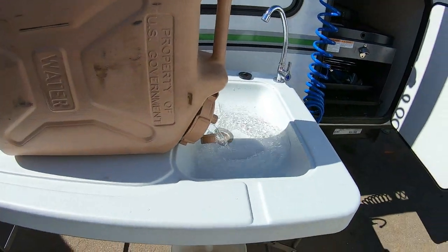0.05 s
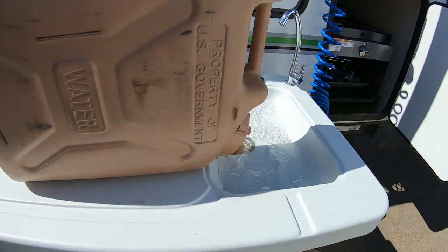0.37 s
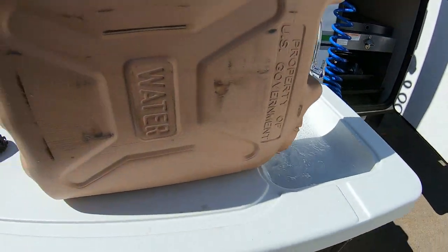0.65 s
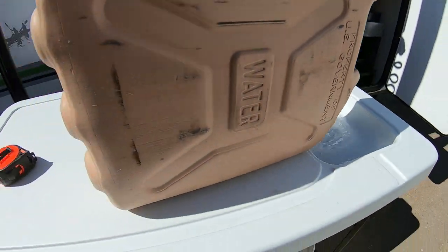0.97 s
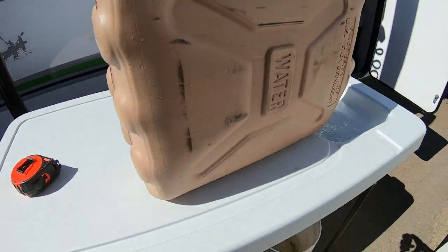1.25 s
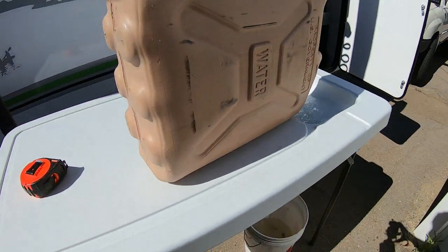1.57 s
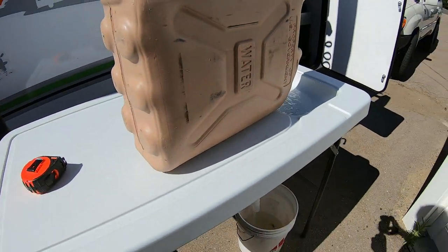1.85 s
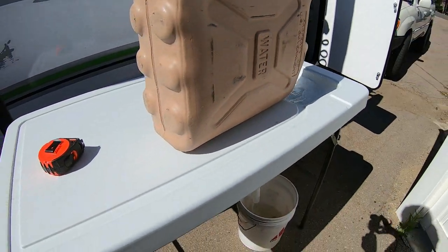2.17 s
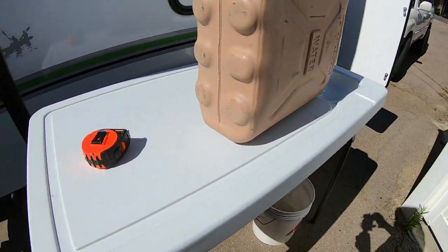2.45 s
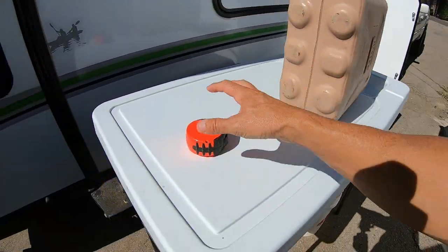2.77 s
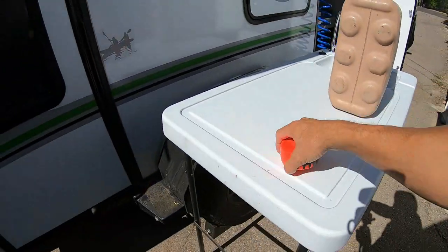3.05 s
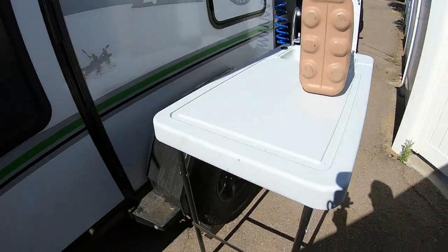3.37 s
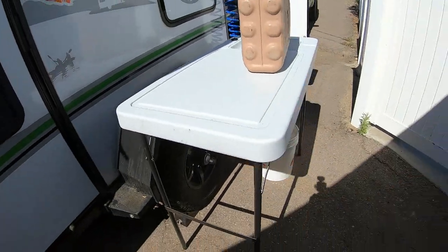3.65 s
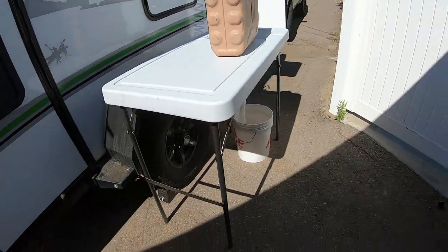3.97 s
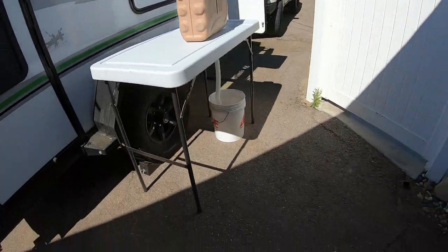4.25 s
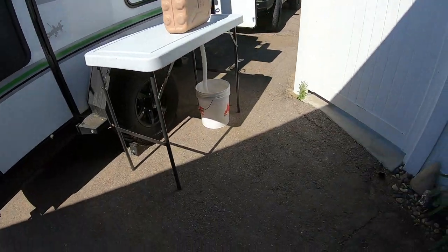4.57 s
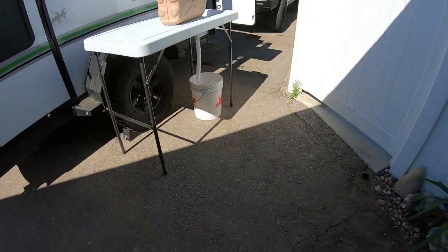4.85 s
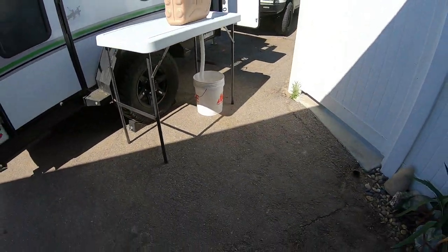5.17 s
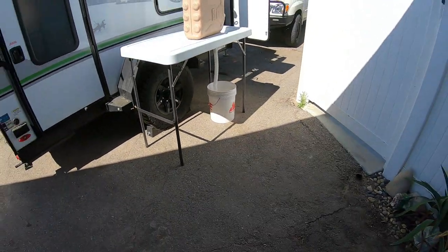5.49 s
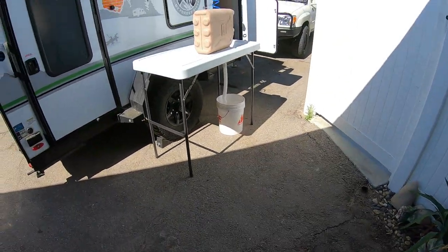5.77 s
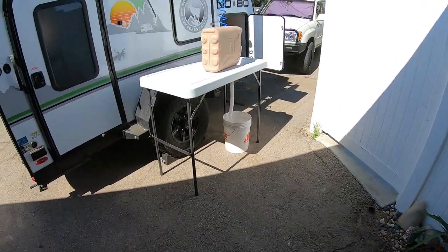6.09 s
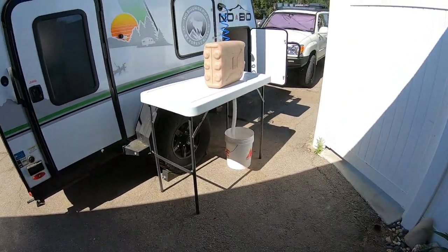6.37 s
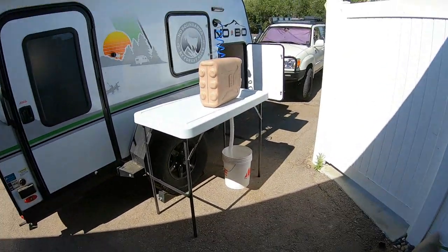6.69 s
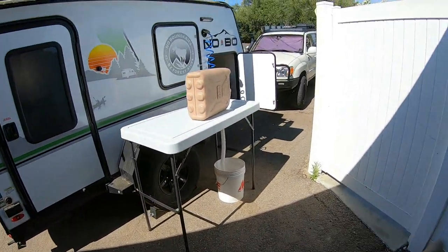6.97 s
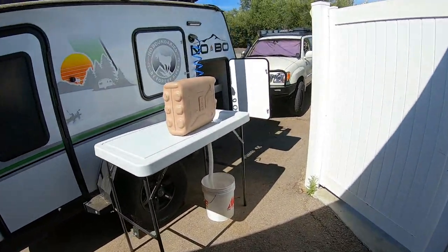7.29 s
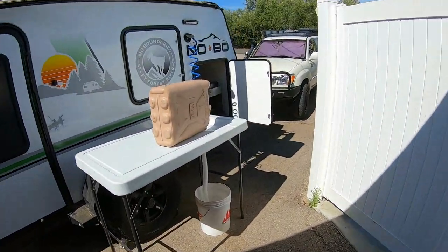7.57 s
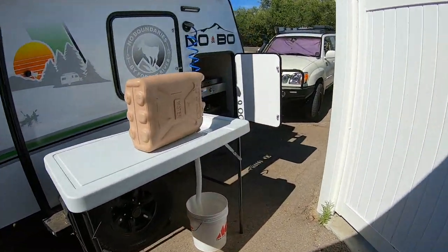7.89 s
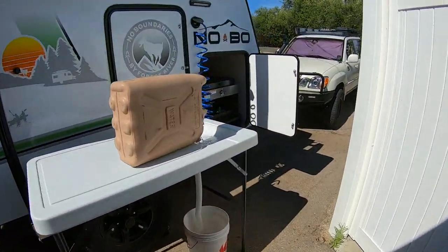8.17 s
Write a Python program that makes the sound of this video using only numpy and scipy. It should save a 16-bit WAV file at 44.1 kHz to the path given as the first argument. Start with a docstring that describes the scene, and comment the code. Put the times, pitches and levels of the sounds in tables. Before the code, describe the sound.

Outdoors, a thin stream of water fizzes, bubbles and splashes into a plastic bucket throughout. At first a fine sizzle of pouring and ticking drops come from a sink, along with dull handling knocks on the handheld microphone. Wind then thumps and rumbles as a hand brushes a table. A single gritty footstep scuff follows, and a few more hollow knocks come late while the trickle carries on.

```python
"""Pouring water into a camp sink

Outdoors, water runs from a plastic can into a sink and drains through a hose into a plastic bucket.
Tiny drops fizz, trapped bubbles ring and lumps of water splash, while the air in the bucket rings along.
A hand bumps the plastic grip of the moving microphone with dull knocks, and wind buffets it.
A hand lifts a tape measure off the table, clothes rustle and a shoe scuffs the asphalt once."""
import sys
import numpy as np
from scipy import signal
from scipy.fft import rfft, irfft, next_fast_len
from scipy.io import wavfile
from scipy.ndimage import uniform_filter1d

SR = 44100
rng = np.random.default_rng(int(sys.argv[2]) if len(sys.argv) > 2 else 0)


def unload_wav(signal):
    """Save mono or channel-first audio to the path in sys.argv[1] as 16-bit WAV at rate SR, clipped to [-1, 1]."""
    wavfile.write(
        sys.argv[1],
        SR,
        np.round(np.clip(np.atleast_2d(signal).T, -1, 1) * 32767).astype(np.int16),
    )


N = 362943
TIME = np.arange(N) / SR

# the tone colour of water drops (how strong each pitch is): pitch_hz, level_db
WATER_COLOUR = [(200, 9), (420, 1.5), (800, -2), (1500, -1), (2300, 1), (3100, 0), (4200, -1), (5500, -5.5),
                (7000, -11.5), (9500, -12.5), (12500, -19), (15700, -26)]
# the tones of the hollow plastic grip: pitch_hz, level_db, ring_s (basic time to fade by 60 dB)
GRIP_TONES = [(75, -6.5, 0.11), (118.6, -2.5, 0.14), (167, -2.5, 0.13), (196.4, 0.5, 0.09),
              (212, -3, 0.067), (287.5, -7, 0.05), (347, -8, 0.067), (518, -0.5, 0.054),
              (583.6, -2.5, 0.076), (660, 7.5, 0.027), (812, 3.5, 0.024), (1000, -5, 0.014),
              (1300, -3, 0.0095), (1720, -8.5, 0.026)]


def from_db(db):
    """Turn decibels into a factor to multiply by."""
    return 10 ** (np.asarray(db) / 20)


def rms_one(x):
    """Scale a signal so that its average strength (rms) is 1."""
    return x / np.sqrt(np.mean(x ** 2) + 1e-20)


def peak_one(x):
    """Scale a signal so that its highest peak is 1."""
    return x / (np.max(np.abs(x)) + 1e-20)


def onset_one(x):
    """Scale a short sound so that the average strength (rms) of its first 20 ms is 1."""
    return x / np.sqrt(np.mean(x[:SR // 50] ** 2) + 1e-12)


def in_time(rows):
    """Join timed points with straight lines: one curve for each column after the time."""
    times, *columns = np.transpose(rows)
    return [np.interp(TIME, times, column) for column in columns]


def coloured(x, colour):
    """Filter a sound by a smooth tone colour that falls away below its first point."""
    size = next_fast_len(len(x))
    hz = np.arange(size // 2 + 1) * SR / size + 1e-3
    points, db = np.transpose(colour)
    gain = from_db(np.interp(np.log(hz), np.log(points), db)) * np.minimum(hz / points[0], 1) ** 2
    return irfft(rfft(x, size) * gain, size)[:len(x)]


def resonate(x, hz, width_hz):
    """Let a sound ring at one pitch; the narrower the width, the longer it rings."""
    r = np.exp(-np.pi * width_hz / SR)
    feedback = [1, -2 * r * np.cos(2 * np.pi * hz / SR), r * r]
    return signal.lfilter(np.array([1, 0, -1]) * (1 - r * r) / 2, feedback, x + 1e-18)


def resonate_twice(x, hz, width_hz):
    """Two resonances in a row let less through on either side of the pitch."""
    return resonate(resonate(x, hz, width_hz), hz, width_hz)


def add(out, start_s, sound):
    """Mix a sound in at its start time."""
    start = int(round(start_s * SR))
    out[start:start + len(sound)] += sound[:len(out) - start]


def clicks(size, per_s, spread_db):
    """Random clicks, up or down: with a positive spread, many small and a few large."""
    out, born = np.zeros(size), rng.random(size) < per_s / SR
    count = born.sum()
    strengths = from_db(spread_db * np.minimum(rng.exponential(1, count), 4))
    out[born] = strengths * rng.choice([-1, 1], count)
    return out


def outdoor_hush(level_db=-47):
    """The far surroundings blend into a soft, steady noise."""
    # the colour of the hush: pitch_hz, level_db
    hush_colour = [(100, 4.5), (200, 1), (400, -7), (800, 0.5), (1400, -4.5), (3800, -14.5), (7000, -16.5),
                   (10000, -19.5), (15700, -25)]
    return from_db(level_db) * rms_one(coloured(rng.standard_normal(N), hush_colour))


def wind(sway_db=5.5, gustiness=0.18, lumpy_db=9.5, buffet_db=-54.5, hum_db=-52.5):
    """Large swirls of air push on the microphone, small ones buffet it; a hollow hum swells with them."""
    # the strength of the wind: time_s, relative_db
    strength_curve = [(0.0, -26), (0.9, -18.5), (1.45, -31.5), (2.3, -23.5), (2.46, -17), (2.55, -22.5),
                      (2.97, -6.5), (3.35, -17.5), (3.68, -15.5), (3.85, -21.5), (4.12, -30.5), (4.45, -19),
                      (5.3, -22), (5.85, -30.5), (6.44, -24.5), (6.85, -35), (7.55, -25.5), (8.23, -24)]
    # the colour of the large swirls: pitch_hz, level_db
    sway_colour = [(6, -2), (12, 6), (22, -10), (32, -16.5), (50, -22.5), (80, -33.5), (130, -44.5),
                   (300, -88.5)]
    # the colour of the small swirls: pitch_hz, level_db
    buffet_colour = [(60, 11.5), (90, -18), (130, 2), (220, -15), (450, -17.5), (1000, -31), (3000, -74)]
    strength_db, = in_time(strength_curve)
    gust_db = strength_db - strength_db.mean()
    noise = rng.standard_normal((3, N))
    swirls = rms_one(coloured(noise[0], sway_colour))
    swirls /= np.sqrt(uniform_filter1d(swirls ** 2, size=SR // 6) + 0.011)  # even out their strength
    push = from_db(strength_db + sway_db + gustiness * gust_db) * swirls
    push = .75 * np.tanh(push / .75)  # the strongest gusts level off
    buffet = rms_one(coloured(noise[1], buffet_colour) * from_db(lumpy_db * swirls))
    hum = rms_one(resonate_twice(noise[2], hz=266.9, width_hz=30))
    return push + from_db(buffet_db + 1.62 * gust_db) * buffet + from_db(hum_db + 0.7 * gust_db) * hum


def gusts(band_ratio=1.284):
    """Each sharp gust thumps the microphone with a short swell of low, swirling air."""
    # the sharp gusts: middle_s, peak_db, swell_s, pitch_hz
    thumps = [(2.461, -14, 0.025, 39.4), (2.748, -19, 0.026, 58.3), (2.908, -7.5, 0.053, 42.4),
              (3.041, -15, 0.028, 57), (3.182, -23.5, 0.058, 80), (3.377, -10.5, 0.056, 42),
              (3.458, -21, 0.019, 63), (3.691, -11.5, 0.0089, 61.4), (4.957, -16, 0.03, 36)]
    t, out = TIME[:SR // 2], np.zeros(N)
    for middle_s, db, swell_s, hz in thumps:
        band = signal.butter(2, [hz / band_ratio, hz * band_ratio], "band", fs=SR, output="sos")
        swirls = signal.sosfilt(band, signal.sosfilt(band, rng.standard_normal(len(t))))
        swell = np.exp(-((t - t.mean()) / swell_s) ** 2)
        add(out, middle_s - t.mean(), from_db(db) * peak_one(swirls * swell))
    return out


def rustles():
    """Rubbing makes tiny clicks: a hand on the table top, and clothes with each move."""
    # a hand brushes the table and lifts a tape measure: time_s, level_db
    brush_curve = [(2.6, -80), (2.72, -52), (2.89, -48), (2.915, -31.5), (2.96, -41.5), (3.1, -53),
                   (3.3, -85)]
    # the colour of that brushing: pitch_hz, level_db
    table_colour = [(240, 4), (360, 11), (480, 0), (700, 2), (1100, -3.5), (2200, -36), (8000, -42)]
    # the moves of the clothes: middle_s, level_db, swell_s
    moves = [(3.078, -42, 0.071), (3.562, -39, 0.047), (4.28, -43.5, 0.11), (4.9, -45, 0.098)]
    # the colour of rubbing cloth: pitch_hz, level_db
    cloth_colour = [(700, 9.5), (1500, 0), (3000, 3.5), (5500, -1.5), (9000, -15), (12800, -9),
                    (15700, -24)]
    grain = clicks(N, per_s=3500, spread_db=5)
    brush = from_db(in_time(brush_curve)[0]) * rms_one(coloured(grain, table_colour))
    swells = sum(from_db(db) / (1 + ((TIME - s) / swell_s) ** 2) ** 2 for s, db, swell_s in moves)
    return brush + swells * rms_one(coloured(grain, cloth_colour))


def scuff(start_s=5.665, heel_db=-33.5, heel_fade_s=0.022, bend_s=0.00495, settle_s=0.035):
    """A heel clicks down and grit grinds under the sole; a hollow ring rises as the weight comes on."""
    # the shoe grinding on asphalt: time_s, level_db
    grind_curve = [(5.66, -77), (5.667, -32), (5.71, -29.5), (5.76, -35), (5.83, -45), (6.1, -67),
                   (6.15, -110)]
    # the colour of the grit: pitch_hz, level_db
    grit_colour = [(60, -2), (140, 13.5), (260, -2), (600, 6.5), (900, -0.5), (1500, -0.5), (2200, -11),
                   (5000, -25), (14000, -53)]
    # the hollow ring of the step: pitch_hz, level_db
    hollow_tones = [(520, 7.5), (640, 3), (748, 9), (1045, 13.5), (1555, 6)]
    t, start = TIME[:SR // 2], int(start_s * SR)
    grit = clicks(N, per_s=9000, spread_db=1.5)
    out = from_db(in_time(grind_curve)[0]) * rms_one(coloured(grit, grit_colour))
    grind = out[start:start + len(t)]
    ring = sum(from_db(db) * resonate(grind, hz, width_hz=18) for hz, db in hollow_tones)
    bent_time = t - bend_s * (1 - np.exp(-t / settle_s))  # runs slow at first, so the pitch starts low
    add(out, start_s, np.interp(bent_time, t, ring))
    heel = rms_one(resonate_twice(grit[:len(t)], hz=2600, width_hz=4000))
    add(out, start_s, from_db(heel_db) * np.exp(-t / heel_fade_s) * heel)
    return out


def fingers(muffle_hz=298):
    """While the hand shifts its hold, the fingers stick and slip softly on the grip."""
    # the shifts of the hand: start_s, end_s, level_db
    shifts = [(0.32, 1.03, -41.5), (7.216, 7.406, -39)]
    slips = clicks(N, per_s=99, spread_db=4)
    rings = sum(from_db(db) * ring_s * resonate(slips, hz, np.log(1000) / (np.pi * ring_s))
                for hz, db, ring_s in GRIP_TONES)
    muffled = signal.sosfilt(signal.butter(2, muffle_hz, fs=SR, output="sos"), rings)
    pressure = sum(from_db(db) * (TIME > start) * (TIME < end) for start, end, db in shifts)
    return uniform_filter1d(pressure, size=SR // 40) * rms_one(muffled)


def knocks(rise_s=0.00058, chatter_above_hz=430):
    """Knocks ring the grip: soft ones reach only its low tones, hard ones chatter, a firm hold damps it."""
    # bumps of the hand, and at 2.464 s a soft, low thump of wind on the microphone:
    # start_s, level_db, hardness_hz, ring_factor, hollow_db, boom_db
    thuds = [(0.3, -12.5, 295, 1.65, 6, 7), (0.327, -18, 420, 0.59, -1, 2),
             (0.561, -30.5, 270, 3.1, -13, 3), (0.72, -14, 400, 1.6, -13, 2), (0.823, 0.5, 440, 0.82, 7, 9),
             (0.888, -8, 230, 0.85, -2, 21), (0.929, -4.5, 290, 0.6, 0, 22),
             (1.309, -15.5, 121, 1.54, 1, -1), (1.712, -17, 141, 1.2, -5, 1),
             (2.464, -20, 200, 1.55, -14, -4), (7.208, 3, 895, 0.67, -8, 8.5),
             (7.228, -5, 160, 0.56, 0, -5), (7.25, -12, 1210, 0.62, 11, -12),
             (7.265, -27, 1200, 0.6, 2, -9), (7.348, -4, 786, 0.95, 5.5, 8),
             (7.484, -13.5, 406, 0.91, 8, 12), (7.839, -21, 300, 2.4, 2, 6.5)]
    # the graze, hit and rebound of a hard bump: delay_s, relative_db, hardness_factor, lowest_hz
    chatter = [(-.0052, -11, 1.57, 600), (0, 2, 1.8, 40), (.0155, -8, 0.7, 60)]
    single_touch = [(0.0011, 0, 1, 0)]
    t, out = TIME[:SR // 4], np.zeros(N)
    hz, tone_db, ring_s = np.transpose(GRIP_TONES)[:, :, None]
    waves = np.sin(2 * np.pi * hz * t) * (1 - np.exp(-t / rise_s))  # the skin gives way first
    hollow, boom = (hz > 545) & (hz < 640), (hz > 180) & (hz < 203)
    variations = from_db(2 * rng.standard_normal((len(thuds), len(chatter), len(GRIP_TONES))))
    for (start_s, db, hardness_hz, ring_factor, hollow_db, boom_db), strengths in zip(thuds, variations):
        fade = from_db(-60 * t / (ring_s * ring_factor))
        tones = waves * from_db(tone_db + hollow_db * hollow + boom_db * boom) * fade
        tones *= 1 - boom * np.exp(-t * hardness_hz / 2)  # the boom swells more slowly after a soft push
        touches = chatter if hardness_hz > chatter_above_hz else single_touch
        for (delay_s, touch_db, hardness_factor, lowest_hz), strength in zip(touches, strengths):
            reach = 1 / (1 + (lowest_hz / hz[:, 0]) ** 4)
            muffle = signal.butter(3, hardness_hz * hardness_factor, fs=SR, output="sos")
            knock = signal.sosfilt(muffle, (strength * reach) @ tones)
            add(out, start_s + delay_s, from_db(db + touch_db) * peak_one(knock))
    return out


def spurts(per_s, fade_s):
    """A wobble around zero: lumps of water land at random and die away, and piles of them level off."""
    step = 64  # samples between points of the curve
    size = N // step + 2
    lumps = (rng.random(size) < per_s * step / SR) * rng.uniform(0.044, 1, size)
    swell = signal.lfilter([1], [1, -np.exp(-step / SR / fade_s)], lumps)
    wobble = np.minimum(rms_one(swell - swell.mean()), 2)
    return np.interp(np.arange(N) / step, np.arange(size), wobble)


def pour(flutter_db=5):
    """The jet from the can breaks into a dense sizzle of fine drops in the sink."""
    # the sizzle, heard until the can screens it: time_s, level_db
    sizzle_curve = [(0.0, -45.5), (0.2, -43), (0.6, -49), (0.9, -51), (1.4, -100)]
    # the colour of the sizzle: pitch_hz, level_db
    sizzle_colour = [(450, -10), (750, 8), (1300, 9), (2500, 2), (5000, 4), (8000, -4.5), (10800, -16),
                     (12200, -1.5), (13500, -22), (15700, -25)]
    sizzle = rms_one(coloured(clicks(N, per_s=7000, spread_db=3.5), sizzle_colour))
    return from_db(in_time(sizzle_curve)[0] + flutter_db * spurts(per_s=50, fade_s=0.018)) * sizzle


def drips(spatter_db=-17.5, spatter_fade_s=0.0058):
    """A drop hits the sink with one crisp tick and throws a brief spatter of finer ones."""
    # drops that strike the bare sink: start_s, peak_db, pitch_hz
    strikes = [(0.063, -33, 6800), (0.11, -24, 9500), (0.1885, -26, 7000), (0.231, -23, 8900),
               (0.3365, -27, 9000), (0.446, -23.5, 7500), (0.583, -27, 8950), (0.641, -19, 8300),
               (0.9235, -26, 8700), (1.1465, -25, 8000), (1.394, -27, 8000), (1.445, -30, 11500),
               (1.542, -22.5, 9500), (1.801, -28, 9000), (1.905, -24, 8700), (1.953, -23, 7100),
               (2.0113, -20.5, 8300), (2.08, -25, 6400), (2.145, -25, 9000), (2.5172, -28, 8500),
               (2.635, -24, 9500), (7.327, -23.5, 7200), (7.698, -25, 7400)]
    t, out = TIME[:SR // 25], np.zeros(N)
    soften = signal.butter(2, 14000, fs=SR, output="sos")
    for start_s, db, hz in strikes:
        hits = clicks(len(t), per_s=3500, spread_db=8) * from_db(spatter_db) * np.exp(-t / spatter_fade_s)
        hits[0] = 1  # the drop itself
        tick = signal.sosfilt(soften, resonate(hits, hz, width_hz=hz / 2.5))
        add(out, start_s, from_db(db) * peak_one(tick))
    return out


def ticks(level_db=-52, leave_s=2.4, fade_db_per_s=16, far_db=-13):
    """Stray droplets tick and spatter on the sink; they grow fainter as the microphone leaves it."""
    t, out = TIME[:SR // 25], np.zeros(N)
    for hz in (7500, 9500, 11500):
        spatter = clicks(len(t), per_s=6800, spread_db=0) * np.exp(-t / .002)
        hits = clicks(N, per_s=12, spread_db=3)
        out += rms_one(resonate_twice(signal.fftconvolve(hits, spatter)[:N], hz, hz / 2))
    away_db = np.maximum(-fade_db_per_s * np.maximum(TIME - leave_s, 0), far_db)
    return from_db(level_db + away_db) * rms_one(coloured(out, WATER_COLOUR))


def showers(level_db=-54, per_s=13, swell_s=0.016):
    """Soft showers of spray fall back into the bucket, each with a pitch of its own."""
    t, out = TIME[:SR // 6], np.zeros(N)
    swell = t / swell_s * np.exp(-t / swell_s)
    for when, pitch, size in rng.random((300, 3))[:int(per_s * N / SR)]:
        hz = 3000 * 3.8 ** pitch
        spray = resonate(clicks(len(t), per_s=1500, spread_db=3) * swell, hz, hz / 4)
        add(out, when * N / SR, (size + .5) * np.sqrt(hz) * rms_one(resonate(spray, hz, hz / 2)))
    return from_db(level_db) * rms_one(coloured(out, WATER_COLOUR))


def bubble(hz, cycles, rise=0.084):
    """One bubble swells quickly and rings away, its pitch rising as it nears the surface."""
    age = np.arange(int(cycles * SR / hz) + 2) * hz / (cycles * SR)  # runs from 0 to 1
    wave = np.sin(2 * np.pi * cycles * age * (1 + rise * age))
    wave *= from_db(-60 * age) * (1 - np.exp(-cycles * age))
    return wave / np.linalg.norm(wave)


def trickle(gurgle_db, spray_db, per_s=55, scatter=0.083, slosh_s=.04, cycles=38, count=8):
    """Small sloshes come at random; each traps a clump of bubbles of similar size."""
    out = np.zeros(N)
    sloshes = rng.random((600, 3 + 3 * count))[:int(per_s * N / SR)]
    for when, pitch, weakness, *clump in sloshes:
        at = int(when * (N - SR // 8))
        hz = 650 * 7.5 ** pitch  # somewhere within about three octaves
        db = (1 - pitch) * (gurgle_db[at] + 21.5) + pitch * (spray_db[at] + 19) - np.log(weakness + .1)
        for delay, detune, weight in np.reshape(clump, (count, 3)):
            plink = bubble(hz * (1 + scatter * (2 * detune - 1)), cycles * (.5 + weight))
            add(out, at / SR + slosh_s * delay ** 2, from_db(db) * weight * plink)
    return out


def plops(offshoot_db=-15, scatter=0.12, follow_s=0.017, count=8):
    """A pocket of air rings as one large bubble, and weaker ones of similar pitch break off it."""
    # pockets of air that gurgle up: start_s, level_db, pitch_hz
    pockets = [(0.166, -35, 1920), (0.217, -41, 1880), (0.217, -43, 2760), (0.529, -40, 1310),
               (0.53, -42, 2120), (0.627, -42, 2760), (0.629, -39, 1490), (0.638, -39, 2500),
               (0.698, -42, 1460), (0.756, -41, 1440), (0.758, -37, 2700), (0.774, -42, 2390),
               (0.801, -37, 2700), (0.967, -31.5, 705), (1.025, -46, 1490), (1.028, -36, 2030),
               (1.029, -34.5, 1010), (1.055, -39.5, 4220), (1.069, -41, 2270), (1.124, -44, 1100),
               (1.177, -41, 1670), (1.203, -45, 3720), (1.265, -35.5, 870), (1.337, -40, 4220),
               (1.346, -39.5, 2690), (1.364, -41, 1660), (1.394, -42, 1735), (1.442, -42, 4180),
               (2.029, -39, 3480), (2.075, -35.5, 2050), (2.093, -36.5, 1440), (2.269, -36.5, 3820),
               (3.126, -44, 2970), (3.221, -43, 1950), (3.425, -39.5, 3360), (3.73, -41.5, 2770),
               (4.2, -41, 1020), (4.289, -43, 2310), (4.523, -45, 1270), (5.219, -38.5, 1026),
               (5.247, -43.5, 1234), (5.373, -41, 818), (5.4, -41, 1790), (5.907, -46, 1870),
               (5.907, -41.5, 2480), (6.357, -40, 2770), (6.99, -40, 795), (7.464, -44, 1310),
               (7.525, -40, 1244), (7.552, -43, 3790), (7.651, -40, 2040), (7.84, -43, 2260),
               (7.87, -41.5, 1930), (8.117, -37.5, 760), (8.122, -39, 1930)]
    out = np.zeros(N)
    for (start_s, db, hz), offshoots in zip(pockets, rng.random((len(pockets), count, 3))):
        ring_s = 0.042 * (2000 / hz) ** 0.28  # larger, lower pockets ring longer
        plop = np.zeros(SR // 8)
        add(plop, 0, bubble(hz, hz * ring_s, rise=0.049))
        for delay, detune, weight in offshoots:
            plink = bubble(hz * (1 + scatter * (2 * detune - 1)), hz * ring_s)
            add(plop, follow_s * delay, from_db(offshoot_db) * (.5 + weight) * plink)
        add(out, start_s, from_db(db) * onset_one(plop))
    return out


def splash(hz, slap_db, rise_s, slap_fade_s=.003, bubbling_share=0.47):
    """A lump of water lands. Two sounds come back: its slap and spray, and its cloud of bubbles."""
    t = TIME[:SR // 8]
    ring_s = 0.15 * (2000 / hz) ** 0.23  # larger, lower splashes last longer
    swell = from_db(-60 * t / ring_s) * (1 - np.exp(-t / rise_s))
    slap = from_db(slap_db) * np.exp(-t / slap_fade_s)
    spray = clicks(len(t), per_s=5000, spread_db=-0.5) * (swell + slap)
    births = clicks(len(t), per_s=4000, spread_db=2) * swell ** (1 / bubbling_share)
    cloud = resonate(births, hz, width_hz=hz / 4.5)
    cloud /= np.linalg.norm(cloud)
    add(cloud, .001, bubble(hz, cycles=25))  # one bubble as strong as the whole cloud
    return onset_one(spray), onset_one(cloud)


def small_lumps(gurgle_db, spray_db, per_s=5, low_hz=820, high_hz=4200):
    """Smaller lumps of water land unevenly and follow the stream's level; gives one row for each."""
    rows = []
    for k, (late, pitch, wet, hollow) in enumerate(rng.random((int(per_s * (N / SR - .1)), 4))):
        start_s = (k + late) / per_s
        at = int(start_s * SR)
        droplets_db = spray_db[at] - 10 + 4 * wet
        bubbles_db = (1 - pitch) * gurgle_db[at] + pitch * spray_db[at] - 5 + 4 * hollow
        rows.append((start_s, droplets_db, bubbles_db, low_hz * (high_hz / low_hz) ** pitch))
    return rows


def splashes(gurgle_db, spray_db, spray_boost_db=6):
    """Large lumps slap the water, smaller ones slide in; one tick of the shoe is made the same way."""
    # the loudest splashes, and at 5.805 s a light tick as the shoe scuff ends:
    # start_s, relative_droplets_db, bubbles_db, pitch_hz
    sharp_hits = [(0.163, -34, -46, 3300), (0.195, -40.5, -35, 895), (0.33, -47, -37, 1120),
                  (0.446, -37.5, -42, 4200), (0.526, -33.5, -39, 880), (0.627, -34.5, -39, 1800),
                  (0.75, -49, -38, 2700), (0.799, -35, -33, 1850), (1.112, -45, -35, 3400),
                  (1.542, -46, -41, 3930), (1.588, -39, -39, 3830), (1.802, -47, -38, 3530),
                  (1.905, -37.5, -47, 3380), (1.966, -32.5, -52, 1460), (2.055, -43, -37.5, 1490),
                  (2.074, -38, -31, 4040), (2.079, -54, -31, 2290), (2.268, -33, -46, 860),
                  (2.528, -50, -39.5, 3100), (2.565, -38, -45, 2950), (2.634, -43.5, -42, 4080),
                  (2.73, -40, -42, 2650), (2.91, -84, -36, 3450), (3.077, -39, -37, 3000),
                  (3.354, -71, -38.5, 3430), (3.578, -36.5, -50, 1250), (3.88, -40, -36, 2980),
                  (4.655, -45, -52, 4800), (5.103, -44.5, -38, 1100), (5.205, -40, -46, 1110),
                  (5.245, -39, -46, 3580), (5.425, -43, -46, 3730), (5.5, -41.5, -50, 1520),
                  (5.805, -40.5, -42, 4500), (6.353, -42, -40.5, 2070), (7.06, -41, -50, 4340),
                  (7.457, -40, -32.5, 1760), (7.545, -44, -41, 2880), (7.693, -43.5, -44, 1250),
                  (7.769, -40.5, -46, 3750), (8.046, -40.5, -45, 4560), (8.16, -36, -46, 2940)]
    # hard and soft landings: rows, slap_db, rise_s
    landings = [(sharp_hits, -8, 0.0024), (small_lumps(gurgle_db, spray_db), -30, .008)]
    sprays, clouds = np.zeros(N), np.zeros(N)
    for rows, slap_db, rise_s in landings:
        for start_s, droplets_db, bubbles_db, hz in rows:
            droplets, bubbles = splash(hz, slap_db, rise_s)
            add(sprays, start_s, from_db(droplets_db + spray_boost_db) * droplets)
            add(clouds, start_s, from_db(bubbles_db) * bubbles)
    return coloured(sprays, WATER_COLOUR) + clouds


def fizz(gurgle_db, spray_db, trim_db=-5, wander_db=2, spurt_db=2):
    """Countless tiny drops fizz; each size comes in spurts of its own, so the colour keeps shifting."""
    drops = rms_one(coloured(clicks(N, per_s=9000, spread_db=0.5), WATER_COLOUR))
    out, edges_hz = np.zeros(N), np.geomspace(250, 16000, 9)
    for low, high in zip(edges_hz, edges_hz[1:]):
        band_filter = signal.butter(2, [low, high], "band", fs=SR, output="sos")
        band = signal.sosfilt(band_filter, np.roll(drops, rng.integers(N)))
        spray_share = np.clip(np.log2(high / 2000), 0, 1)
        db = (1 - spray_share) * (gurgle_db + 6) + spray_share * (spray_db + 2)
        out += band * from_db(db + wander_db * spurts(per_s=24, fade_s=0.0099))
    return out * from_db(trim_db + spurt_db * spurts(per_s=34, fade_s=0.028))


def water(ring_trim_db=-2):
    """The falling stream fizzes, bubbles and splashes, and the air in the bucket rings along."""
    # the stream's relative level as the microphone moves away and back:
    # time_s, gurgle_db (large bubbles), spray_db (small ones)
    stream_curve = [(0.0, -49, -42.5), (0.8, -44, -40), (1.12, -44.5, -41), (1.65, -48.5, -44),
                    (2.04, -41.5, -41), (3.78, -51.5, -44.5), (4.33, -43, -41.5), (4.67, -49.5, -48.5),
                    (5.66, -44.5, -43.5), (6.88, -47.5, -47.5), (7.43, -42.5, -42), (8.23, -44.5, -43)]
    # the tones of the air in the bucket: pitch_hz, width_hz, relative_db
    bucket_tones = [(507, 110, -1.5), (819, 22, 2), (1280, 26, 5.5), (1501, 22.5, 4.5), (1900, 24, -6),
                    (2868, 36, 0)]
    gurgle_db, spray_db = in_time(stream_curve)
    stream = fizz(gurgle_db, spray_db) + trickle(gurgle_db, spray_db)
    stream += ticks() + showers() + plops() + splashes(gurgle_db, spray_db)
    ring = sum(from_db(db + ring_trim_db) * resonate(stream, hz, width) for hz, width, db in bucket_tones)
    return stream + ring


def with_echoes(x):
    """Nearby hard surfaces add faint, quick echoes; the overall loudness stays about the same."""
    # echoes from the ground, a trailer and a fence: delay_s, level_db
    echoes = [(0.0023, -24.5), (0.0051, -14), (0.0094, -14.5), (0.0184, -17), (0.031, -19.5)]
    out = x.copy()
    for delay_s, db in echoes:
        add(out, delay_s, from_db(db) * x)
    return out / np.sqrt(1 + sum(from_db(db) ** 2 for delay_s, db in echoes))


def scene():
    """Mix the hush, the wind, the person's movements and the water into one channel."""
    background = outdoor_hush() + knocks() + wind() + gusts() + scuff() + fingers() + rustles()
    return (background + with_echoes(water()) + pour() + drips())[None]


def record(dry, ceiling=.97, cutoff_hz=15750):
    """Round off the highest peaks and cut the very top of the treble."""
    rounded = dry / (1 + (dry / ceiling) ** 8) ** (1 / 8)
    return signal.sosfilt(signal.ellip(12, .1, 90, cutoff_hz, fs=SR, output="sos"), rounded)


dry = scene()
out = record(dry)
unload_wav(out)
```